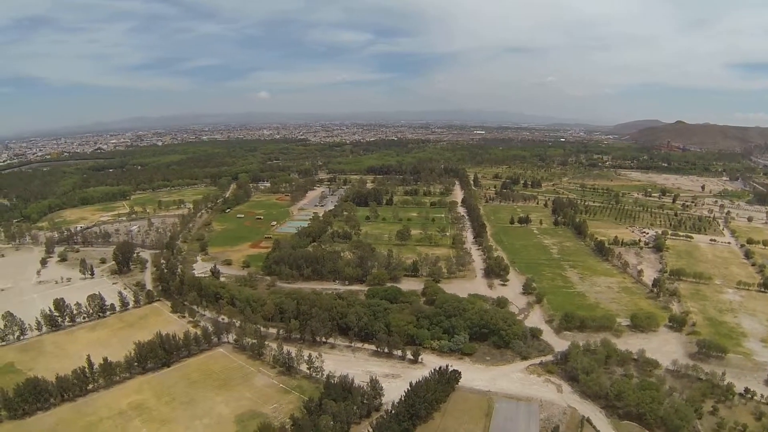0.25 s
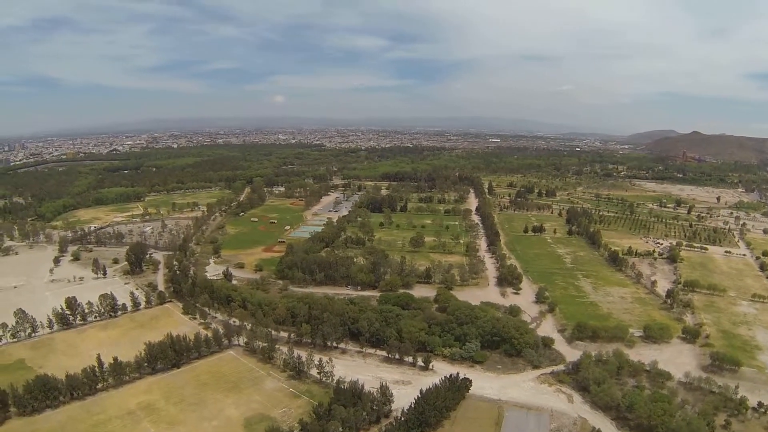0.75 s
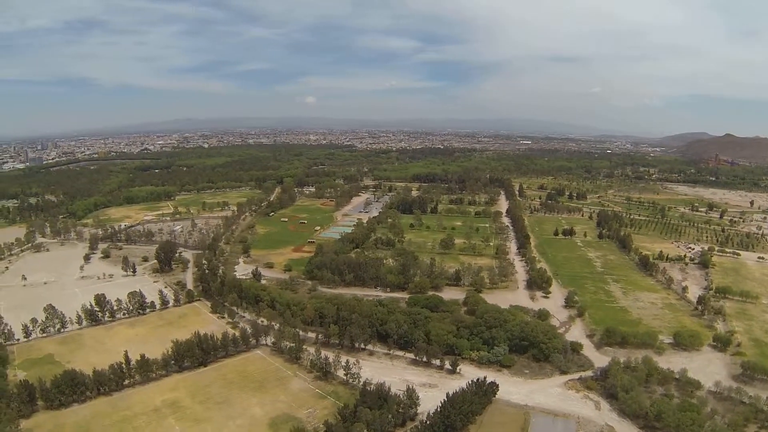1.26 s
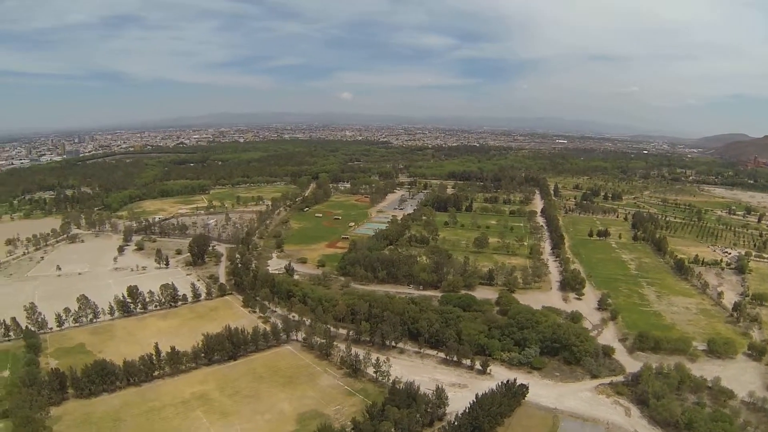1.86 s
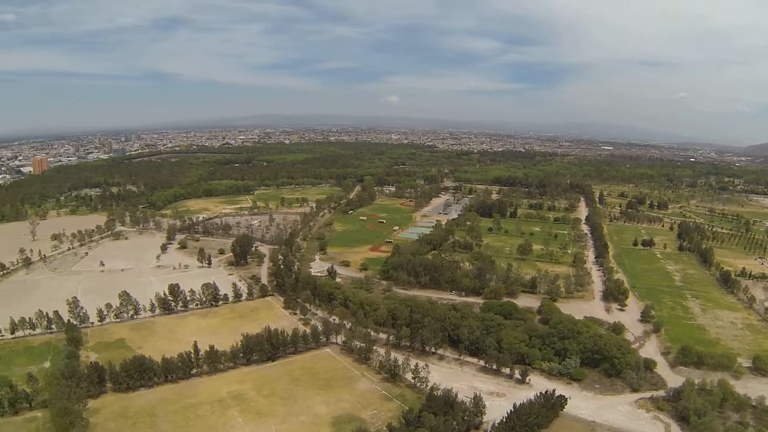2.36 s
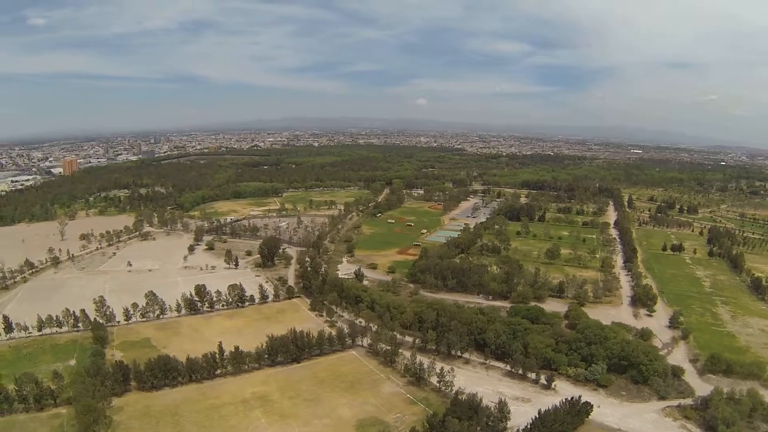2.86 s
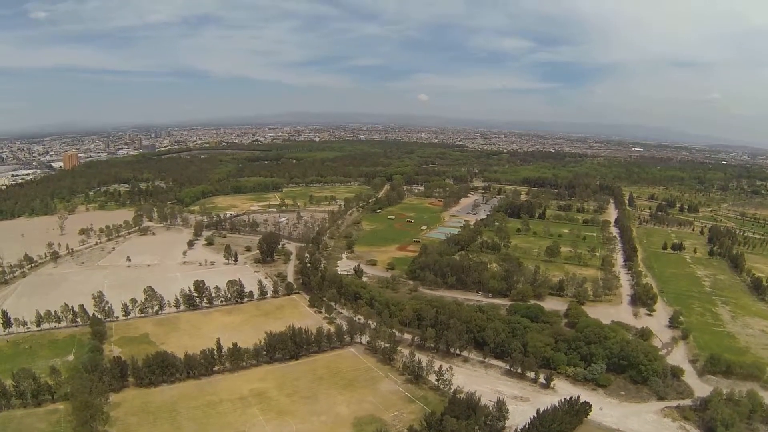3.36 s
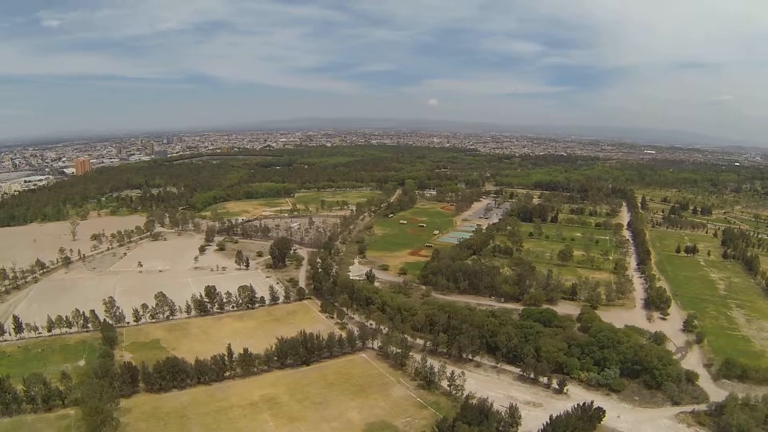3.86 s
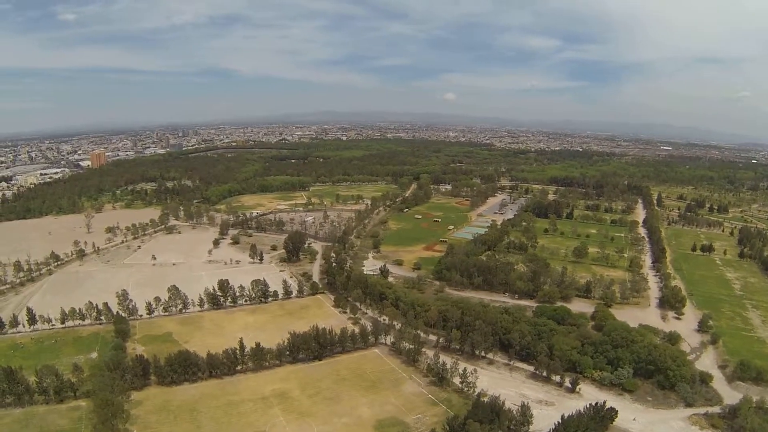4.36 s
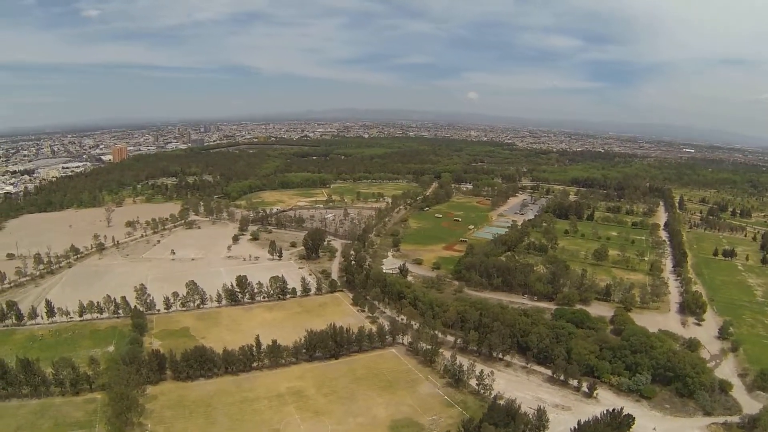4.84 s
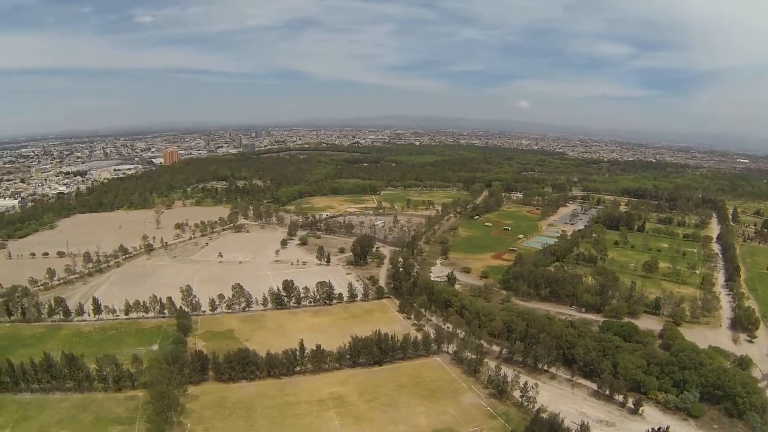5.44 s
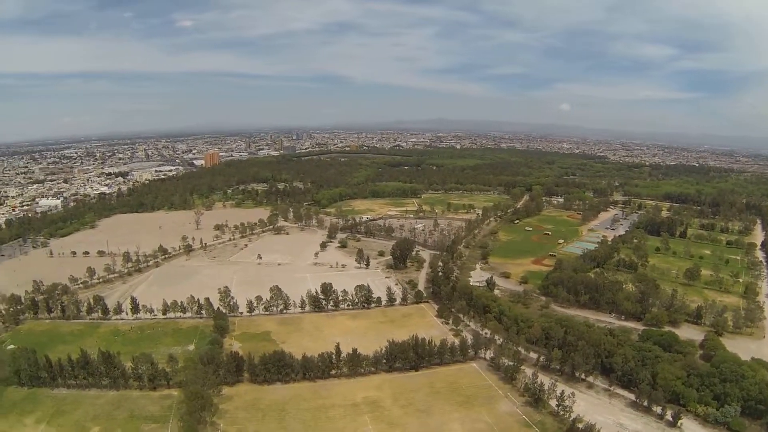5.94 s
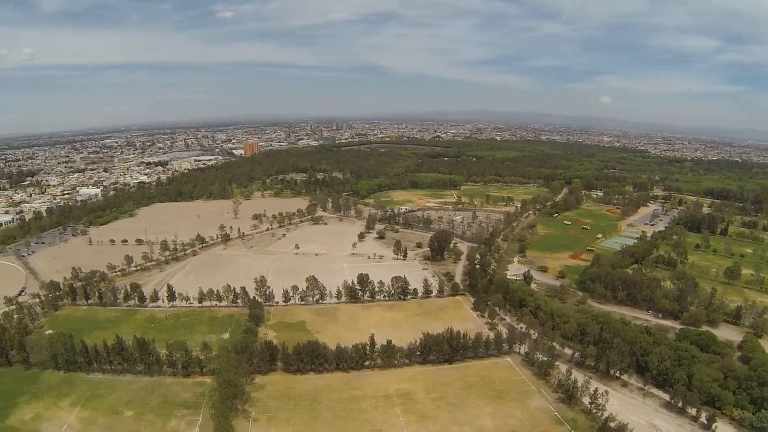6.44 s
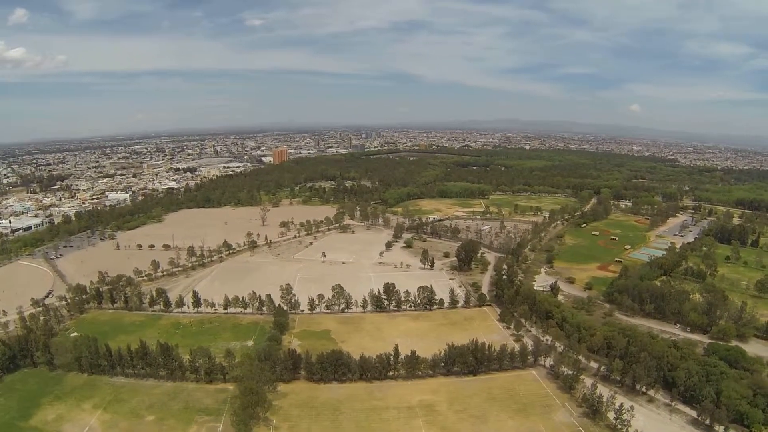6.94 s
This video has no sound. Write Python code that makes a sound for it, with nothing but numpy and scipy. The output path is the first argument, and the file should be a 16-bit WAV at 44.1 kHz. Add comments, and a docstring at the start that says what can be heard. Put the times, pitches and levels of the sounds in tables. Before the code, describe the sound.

Close under a flying drone, several propellers beat together in a low pulsing hum with airy wash, faint hiss, soft blade slaps and brief gritty buzzes.

```python
"""Six-rotor drone in flight

A drone is heard from the camera that hangs under it. Its six propellers hum and rasp at drifting speeds.
They throb when their blades fall in step; filtered noise makes the wind, propeller wash, swish and hiss.
The camera mount buzzes in bursts made of clicks, and its electronics whistle as close, thin tones.
Blades slap now and then and the frame ticks. The gain control ducks everything when the sound gets too loud.
"""
import sys
import numpy as np
from scipy import signal
from scipy.fft import rfft, irfft
from scipy.io import wavfile
from scipy.ndimage import uniform_filter1d, minimum_filter1d

SR = 44100
rng = np.random.default_rng(int(sys.argv[2]) if len(sys.argv) > 2 else 0)


def wrap_up_sound(samples):
    """Save the sound to the file named by the first command line argument, as 16-bit audio."""
    columns = np.atleast_2d(samples).T
    # keep every value between -1 and 1, then stretch to whole-number steps
    tamed = np.clip(columns, -1, 1)
    steps = np.round(tamed * 32767).astype(np.int16)
    wavfile.write(sys.argv[1], SR, steps)


N = 317520
T = np.arange(N) / SR  # time of each sample, in seconds

# Shaft speed of each rotor: time_s, speed_rev_per_s
SPEED_1 = [(0, 180), (.5, 177), (1.4, 179.5), (1.95, 176), (2.9, 183.5), (3.5, 178), (5.3, 173.3),
           (6.7, 181), (7.2, 181)]
SPEED_2 = [(0, 166.9), (.23, 169.7), (.43, 166.3), (.52, 166.5), (.72, 164.5), (.9, 166.5), (1.03, 167),
           (1.2, 169.9), (1.35, 168.3), (1.58, 168.8), (1.95, 165.3), (2.42, 166), (2.53, 167.9),
           (2.83, 169.6), (3, 167.5), (3.2, 168.8), (3.35, 164), (3.48, 162), (3.66, 161.5), (3.99, 156.8),
           (4.31, 158.3), (4.5, 154.5), (4.66, 152.5), (4.74, 155.5), (4.9, 154.8), (5.1, 152.8),
           (5.27, 149.8), (5.47, 152.3), (5.56, 155.5), (5.86, 154.9), (6.03, 157.4), (6.2, 155.6),
           (6.5, 159.6), (6.68, 159.9), (6.85, 161.8), (7.05, 161), (7.2, 162)]
SPEED_3 = [(0, 150.7), (.25, 151.3), (.8, 157), (1.1, 155), (1.6, 153), (2.3, 156.5), (2.6, 151),
           (2.95, 145), (3.6, 148.5), (4, 146.9), (5.1, 150.1), (5.9, 147), (7.2, 148)]
SPEED_4 = [(0, 165.5), (1, 171.6), (2.6, 174.5), (3.5, 169.8), (4.3, 162.2), (4.7, 166), (5.2, 170.1),
           (5.65, 169.7), (6.1, 164), (6.7, 165.2), (7.2, 164)]
SPEED_5 = [(0, 155.2), (0.701, 162), (2.4, 160.2), (4.1, 150.6), (5.601, 148.2), (6.501, 151.1),
           (7.2, 156.6)]
SPEED_6 = [(0, 160.1), (2, 168.4), (2.6, 165.1), (4.599, 158.5), (6.403, 162.6), (7.2, 152.8)]
# Four near rotors, before throbs reshape the hum and gusts lift the rasp:
# time_s, hum_db, rasp_db, shake_db (shake comes from imbalance)
NEAR_1 = [(0, -31, -54, -24), (.8, -37, -46.5, -28), (1.95, -39.5, -51.5, -22.5), (2.5, -37, -60.5, -22.5),
          (4.3, -30.5, -62.5, -28.5), (5.2, -31, -55, -28), (6.2, -28.5, -59.5, -27),
          (7.2, -30, -54.5, -28)]
NEAR_2 = [(0, -21.5, -62.5, -22), (.7, -22.5, -55.5, -20), (1.3, -19, -65, -19.5), (2.2, -16.5, -57, -28),
          (3.1, -22.5, -53.5, -28), (3.65, -27, -56.5, -21.5), (3.9, -21, -38, -28), (4.3, -21, -38, -38.5),
          (4.85, -26, -39, -34), (5.3, -34, -41, -35), (5.75, -14, -37, -29.5), (6.3, -22, -38.5, -29),
          (6.8, -16.5, -37.5, -28.5), (7.2, -17.5, -38.5, -26)]
NEAR_3 = [(0, -22.5, -45.5, -25), (1.1, -31.5, -42.5, -25), (2.1, -24, -46.5, -29.5), (2.9, -29, -48, -41),
          (4.9, -22, -50.5, -40), (6, -22, -55.5, -47), (7.2, -26, -50.5, -43.5)]
NEAR_4 = [(0, -26.5, -55.5, -46), (1, -28.5, -60.5, -37), (2.1, -24.5, -59, -40.5), (3.6, -26.5, -67, -40),
          (4.3, -19, -65, -33.5), (4.7, -16, -59.5, -29), (5.4, -18, -57, -34.5), (6.4, -28, -64.5, -30.5),
          (7.2, -24, -59, -34)]
# Each of the two far rotors, likewise: time_s, hum_db, rasp_db
FAR = [(0, -34.5, -54.5), (1, -29, -62.5), (2.1, -24.5, -57.5), (3.6, -20, -63.5), (4.3, -13, -64.5),
       (5.4, -20.5, -54.5), (6.4, -25, -66), (7.2, -21.5, -55)]
FAR_SHAKE_DB = -36
# Overtones of each propeller: multiple_of_shaft_speed, level_db
OVERTONES = [(3, -43), (4, -39), (5, -47)]
# Tone colour of the once-a-turn rasp, then the brighter one of the first motor: pitch_hz, relative_level_db
RASP_COLOUR = [(400, -20), (560, -2.5), (630, 7), (770, 3), (920, 6.5), (1080, 7.5), (1240, 5), (1420, 2),
               (1600, -1.5), (1950, -7), (2300, -17.5), (3100, -21.5), (3480, -10.5), (3850, -20.5),
               (5000, -29.5), (7000, -45.5), (9000, -66.5)]
BRIGHT_RASP_COLOUR = [(500, -10), (720, 1), (1000, -4), (1250, -1), (1800, -5), (2150, 1), (2480, -2),
                      (2850, -21), (4500, -22), (9000, -55)]
# Throbs, when the blades fall in step: peak_s, target_level_db, length_s
THROBS = [(0.132, -13, 0.029), (0.273, -14, 0.053), (0.439, -16, 0.32), (0.499, -12, 0.02),
          (0.556, -9.5, 0.011), (0.628, -12.5, 0.097), (0.718, -9, 0.044), (0.801, -8, 0.13),
          (0.961, -13.5, 0.11), (1.065, -14, 0.016), (1.152, -9, 0.11), (1.282, -13.5, 0.056),
          (1.323, -10.5, 0.17), (1.458, -11.5, 0.052), (1.548, -11.5, 0.037), (1.592, -15, 0.046),
          (1.657, -13.5, 0.047), (1.749, -14.5, 0.027), (1.802, -12, 0.029), (1.871, -15.5, 0.02),
          (1.935, -12.5, 0.07), (1.997, -8, 0.037), (2.033, -14.5, 0.048), (2.092, -13, 0.026),
          (2.174, -16.5, 0.045), (2.214, -15, 0.17), (2.264, -13, 0.19), (2.354, -13, 0.048),
          (2.455, -16, 0.16), (2.605, -11, 0.077), (2.683, -10, 0.066), (2.812, -11, 0.044),
          (2.876, -11.5, 0.078), (2.988, -14.5, 0.04), (3.029, -14, 0.054), (3.13, -16.5, 0.13),
          (3.28, -16, 0.072), (3.35, -12, 0.046), (3.409, -10.5, 0.022), (3.486, -14, 0.1),
          (3.583, -14.5, 0.082), (3.64, -14, 0.043), (3.708, -15.5, 0.034), (3.791, -15, 0.063),
          (3.83, -19.5, 0.028), (3.875, -13.5, 0.038), (3.974, -11, 0.075), (4.086, -10.5, 0.071),
          (4.148, -13.5, 0.024), (4.255, -7, 0.059), (4.338, -14, 0.044), (4.443, -8.5, 0.048),
          (4.561, -14, 0.041), (4.632, -15, 0.086), (4.707, -18.5, 0.031), (4.755, -12, 0.039),
          (4.797, -13.5, 0.032), (4.936, -17, 0.075), (4.988, -7, 0.028), (5.027, -12.5, 0.022),
          (5.073, -14.5, 0.058), (5.147, -16, 0.016), (5.189, -7.5, 0.028), (5.227, -9.5, 0.028),
          (5.269, -10.5, 0.024), (5.401, -15.5, 0.052), (5.466, -9.5, 0.046), (5.515, -11, 0.025),
          (5.621, -9.5, 0.094), (5.713, -9.5, 0.018), (5.783, -11.5, 0.065), (5.923, -14.5, 0.061),
          (6.005, -12.5, 0.1), (6.092, -7.5, 0.032), (6.189, -12.5, 0.062), (6.235, -11.5, 0.02),
          (6.317, -9, 0.057), (6.419, -7.5, 0.039), (6.53, -7.5, 0.071), (6.631, -10, 0.082),
          (6.677, -12, 0.021), (6.787, -7.5, 0.048), (6.848, -13.5, 0.041), (6.919, -17, 0.087),
          (6.994, -13.5, 0.035), (7.138, -13.5, 0.088)]
LULL_DB = -25  # target level between throbs
# Octave above the hum: time_s, level_relative_to_hum_db
OCTAVE = [(0, -29.5), (3, -24), (4.3, -18.5), (5.8, -14.5), (7.2, -24.5)]
# Gusts that make the blades rasp harder: peak_s, extra_level_db
SURGES = [(.28, 1), (1.06, 1.5), (1.531, 1.5), (1.9, 3.5), (2.58, 3), (3.94, 2.5), (4.229, 1.5), (4.9, 2.5),
          (5.16, 1.5), (5.38, 1), (5.91, 1.5), (6.4, 1.5), (6.51, 0.5)]
SURGE_S = 0.06  # length of each gust
# Blade slaps, each moved to a nearby crest of the hum: time_s, peak_db
SLAPS = [(.182, -13), (.384, -15), (1.137, -15), (1.655, -15), (1.943, -14), (2.599, -12), (2.803, -16),
         (2.864, -12), (2.903, -13), (3.092, -12), (3.215, -10), (3.337, -8), (3.404, -12), (3.471, -13),
         (4.379, -13), (4.56, -13), (4.623, -14), (4.974, -14), (5.027, -12), (5.222, -14), (5.308, -14),
         (5.458, -11.5), (5.579, -15), (5.7, -12), (5.895, -12), (5.917, -14), (6.084, -11), (6.404, -10),
         (6.776, -14), (6.985, -13), (7.127, -13)]
SLAP_HZ, SLAP_S = 560, .0012  # pitch; time from its middle until it fades to about a third
# Wind on the microphone: time_s, level_db
BUFFET = [(0, -20), (.3, -15.5), (.45, -19.5), (.7, -21.5), (.95, -17.5), (1.2, -20.5), (1.55, -22.5),
          (1.85, -20.5), (2.1, -21), (2.3, -17.5), (2.8, -18), (3, -19), (3.35, -16), (3.6, -22),
          (4.1, -25.5), (4.2, -27), (4.3, -19.5), (4.58, -24), (4.7, -28), (4.8, -20.5), (4.9, -22),
          (5.1, -19.5), (5.27, -23.5), (5.4, -19.5), (5.52, -27), (5.7, -27), (5.9, -29), (6.1, -23.5),
          (6.25, -20), (6.55, -22.5), (7.05, -21), (7.2, -19.5)]
GUST_DB, GUST_RATE_HZ = -0.2, 6  # size and rate of random changes in the wind
# Slow changes of the airflow; gusts also lift the swish: time_s, wash_db, swish_db, hiss_db
AIR = [(0, -21.5, -39, -53.5), (.7, -22.5, -39.5, -50.5), (1.5, -22, -44.5, -55.5),
       (1.9, -22.5, -44, -53.5), (2.02, -22.5, -42, -56), (2.27, -24.5, -42.5, -58.5),
       (2.55, -22, -41.5, -55), (3.2, -22.5, -40.5, -58), (3.6, -21, -40.5, -56.5), (4, -22.5, -40.5, -56),
       (4.5, -23, -41.5, -56), (4.9, -23, -40, -55), (5.4, -22, -40.5, -57), (5.9, -20, -41, -54.5),
       (6.3, -23.5, -40.5, -58), (7.2, -22, -42.5, -57.5)]
# Tone colours of the air layers: pitch_hz, relative_level_db_per_hz
WIND_COLOUR = [(10, -29.5), (25, -7), (45, -1.5), (64, -3), (81, -1.1), (95, -2), (120, -6), (160, -11),
               (210, -13), (300, -10), (600, -42), (1500, -81)]
WASH_COLOUR = [(150, -4), (215, -10), (246, -1), (275, -2), (360, -0.5), (450, 0), (540, -6), (620, -3.5),
               (740, -1.5), (820, -14), (1000, -25), (1500, -34.5), (4000, -85)]
SWISH_COLOUR = [(500, -24), (900, 2.5), (1300, -4), (1900, -7), (2300, -10.5), (2900, -17), (3450, -15),
                (4200, -24.5), (5500, -42), (9000, -63.5)]
HISS_COLOUR = [(1500, -14), (3000, -10.5), (3500, 2), (4700, 2), (5800, -5), (6800, -6), (8200, -12),
               (10000, -20.5), (11200, -27.5), (12300, -72.5)]
# Bursts of chatter from the camera mount: start_s, end_s, buzz_db, high_ring_db
BUZZES = [(0, .025, -47, -59), (.07, .28, -47.5, -59), (.28, .425, -46.5, -56), (.465, .53, -50, -57),
          (.585, .635, -43.5, -56), (.635, .76, -48, -56), (.93, 1.03, -53, -59), (1.03, 1.105, -46, -56),
          (1.39, 1.425, -48, -64), (1.755, 1.85, -47.5, -54.5), (1.85, 1.96, -47, -59),
          (2.08, 2.15, -54, -64), (2.15, 2.2, -48, -55.5), (2.285, 2.335, -50.5, -55),
          (2.335, 2.44, -50.5, -72), (2.56, 2.62, -49.5, -62), (2.655, 2.7, -53, -64),
          (2.77, 2.83, -53, -62), (2.88, 2.97, -57, -66), (3.075, 3.25, -52, -70), (3.27, 3.34, -48.5, -56),
          (3.34, 3.48, -48.5, -58.5)]
BUZZ_HZ = 123.1  # contacts per second
GRIT = .22  # scrape in the contacts, relative to their clicks
# Tone colours of the mount's buzz and high ring: pitch_hz, relative_level_db
BUZZ_COLOUR = [(120, -23.5), (2000, 11.5), (2900, -20.5), (3330, 11), (3600, 3), (3940, 8), (4300, -16),
               (4750, -19.5), (5400, -30.5), (7000, -17.5), (9500, -21.5), (12000, -34)]
BUZZ_RING_COLOUR = [(3600, -27), (4200, -2), (4750, 2), (5150, -3.5), (5500, -11.5), (7000, -15.5),
                    (9500, -31.5), (12000, -36)]
# Continuous sound of the mount, humming at twice the chatter rate: time_s, hum_db, whirr_db
MOUNT_HUM = [(0, -43, -54), (.7, -29, -47), (1.9, -26.5, -51), (3, -52, -63), (4, -39, -65),
             (7.2, -41, -60)]
# Tone colour of the whirr: pitch_hz, relative_level_db
WHIRR_COLOUR = [(800, -17.5), (1230, 5), (1600, 7.5), (2000, -5), (2400, -8), (2900, -30.5)]
# Tones of the electronic whistle: pitch_hz, relative_level_db
WHISTLE_LINES = [(8040.5, 0), (8067.5, -5.5), (8071, -10)]
# Whole whistle: time_s, level_db
WHISTLE = [(0, -59.5), (.9, -56.5), (2.3, -60.5), (4.3, -65), (5.9, -62.5), (6.4, -64.5), (7.2, -63.5)]
# Whine of the second motor: time_s, level_db
WHINE = [(0, -67), (.4, -69), (.5, -62), (.95, -67), (1.2, -68), (1.9, -67), (2.3, -69), (3.2, -71),
         (3.6, -70.5), (4.2, -79), (6.4, -80.5), (6.8, -72), (7.2, -72)]
WHINES_PER_TURN = 42
# Small ticks of the frame: start_s, starting_level_db
TICKS = [(2.578, -50), (3.32, -35), (5.174, -43), (6.088, -37)]
# Gain control: ceiling, speed of recovery, time to sense loudness, time to duck
LIMIT_DB, RECOVER_DB_PER_S, SENSE_S, ATTACK_S = -11, 33, 0.0026, 0.0004
PEAK_CEILING = .8  # 1 is full scale
EDGE_HZ = 14600  # top of the camera's sound band


def gain_of(db):
    """Turns decibels into amplitude."""
    return 10 ** (np.asarray(db) / 20)


def evened(x):
    """Scales a sound to an average (rms) level of 1."""
    return x / np.sqrt(np.mean(x ** 2) + 1e-20)


def curves(rows):
    """Draws each column after the time as a smooth-running value for every sample."""
    s, *columns = np.transpose(rows)
    return [np.interp(T, s, column) for column in columns]


def coloured(x, points):
    """Filters by a tone colour that falls away above its last point; rms 1."""
    hz, db = np.transpose(points)
    bins = np.fft.rfftfreq(N, 1 / SR)
    level_db = np.interp(np.log(bins + 1), np.log(hz), db)
    fall = np.maximum(bins / hz[-1], 1) ** 2
    return evened(irfft(rfft(x) * gain_of(level_db) / fall, N))


def noise():
    """White noise, with all pitches equally strong."""
    return rng.standard_normal(N)


def drift(rate_hz):
    """Random wandering, mostly slower than the given rate; rms 1."""
    bins = np.fft.rfftfreq(N, 1 / SR)
    return evened(irfft(rfft(noise()) / (1 + (bins / rate_hz) ** 2), N))


def lagged(x, seconds):
    """Follows x with the given time constant."""
    keep = np.exp(-1 / (seconds * SR))
    return signal.lfilter([1 - keep], [1, -keep], x)


def pulses(turns):
    """One click at each whole turn, shared between the two nearest samples."""
    at = np.flatnonzero(np.diff(np.floor(turns)) > 0)
    late = (np.floor(turns[at + 1]) - turns[at]) / (turns[at + 1] - turns[at])
    out = np.zeros(N)
    out[at], out[at + 1] = 1 - late, late
    return out


def swells(rows):
    """Sum of smooth rises and falls, from rows of peak_s, height, length_s."""
    t = T[::64]  # a coarse grid is enough for slow shapes
    shape = sum(height * np.exp(-(2 * (t - s) / length) ** 2) for s, height, length in rows)
    return np.interp(T, t, shape)


def surge_db():
    """Extra level of the blade noise while the propellers bite into gusts."""
    return swells((s, db, SURGE_S) for s, db in SURGES)


def turns_of(speed):
    """Adds up shaft speed into turns, from a random starting angle."""
    return np.cumsum(speed) / SR + rng.random()


def in_step(turns, lead, slip=.5):
    """Blade phase of a two-bladed rotor, eased to nearly meet the lead rotor's at every throb."""
    times = np.transpose(THROBS)[0]
    behind = np.interp(times, T, 4 * np.pi * (lead - turns))
    # a random miss in radians; unwrapping then takes the shortest way round
    behind = np.unwrap(behind + slip * rng.standard_normal(len(times)))
    return 4 * np.pi * turns + np.interp(T, times, behind)


def rotor(speed_rows, lead, hum_db, rasp_db, shake_db, colour,
          wobble=0.014, flutter=0.16, sway_db=1, overtone_sway_db=2):
    """Blades passing twice a turn hum, imbalance shakes once a turn, and clicks once a turn rasp."""
    speed, = curves(speed_rows)
    turns = turns_of(speed)
    rasp_db = rasp_db + surge_db()
    # uneven inflow makes each blade pass a little early or late, strong or weak
    early = 2 * np.pi * wobble * drift(6.9)
    load = np.sqrt(2) * gain_of(hum_db + sway_db * drift(3.4)) * (1 + flutter * drift(17))
    angle = 2 * np.pi * turns + early
    blade = in_step(turns, lead) + 2 * early
    hum = load * np.exp(1j * blade)  # complex, so its phase stays at hand
    overtone_gain = np.sqrt(2) * gain_of(overtone_sway_db * drift(2.8))
    overtones = overtone_gain * sum(gain_of(db) * np.cos(k * angle) for k, db in OVERTONES)
    shake = np.sqrt(2) * gain_of(shake_db) * np.sin(angle)
    clicks = pulses(turns + .003 * drift(20)) * (1 + .28 * drift(60))
    rasp = gain_of(rasp_db) * coloured(clicks, colour)
    # once-a-turn puffs, later used to shape the swish and hiss
    puffs = gain_of(rasp_db) ** 2 * np.exp(1.8 * (np.cos(2 * np.pi * turns) - 1))
    return hum, overtones + shake + rasp, puffs


def throbbing(hum, depth=0.76, least_db=-23):
    """Pulls the summed hum part of the way towards the strength of each throb and of the lulls."""
    throbs = swells((s, gain_of(db) ** 2, length) for s, db, length in THROBS)
    power = gain_of(LULL_DB) ** 2 + throbs
    # the floor keeps weak moments from being boosted too far
    beating = uniform_filter1d(abs(hum) ** 2 / 2, size=900) + gain_of(least_db) ** 2
    return hum * (power / beating) ** (depth / 2)


def octave(hum):
    """Doubles the phase of the hum to sound its octave, which swells with it."""
    return gain_of(curves(OCTAVE)[0]) * abs(hum) * np.cos(2 * np.angle(hum))


def air(hum, puffs, throb=0.038, wash_throb=0.048, flicker_db=1.5):
    """Noise as gusty wind and wash; swish and hiss come in puffs and swell where the rotors beat in step."""
    wind_db, = curves(BUFFET)
    wash_db, swish_db, hiss_db = curves(AIR)
    beat = 0.084 + evened(uniform_filter1d(abs(hum), size=300))
    pulsed = .62  # share of the noise power that comes in puffs
    gate = np.sqrt(1 - pulsed + pulsed * puffs / uniform_filter1d(puffs, size=4410))
    gate = gate * beat ** (2 * throb) * gain_of(flicker_db * drift(77))
    wind = gain_of(wind_db + GUST_DB * drift(GUST_RATE_HZ)) * coloured(noise(), WIND_COLOUR)
    wash = gain_of(wash_db) * coloured(noise() * beat ** (2 * wash_throb), WASH_COLOUR)
    swish = gain_of(swish_db + surge_db()) * coloured(noise() * gate, SWISH_COLOUR)
    hiss = gain_of(hiss_db) * coloured(noise() * (0.42 + gate), HISS_COLOUR)
    return wind + wash + swish + hiss


def mount_buzz(waver=1.0, unsteady_db=-0.5):
    """The stabiliser hums and whirrs, and chatters in bursts of slightly uneven, scraping clicks."""
    level = sum(gain_of(dbs)[:, None] * ((T > start) & (T < end)) for start, end, *dbs in BUZZES)
    clicks = pulses(BUZZ_HZ * T + .007 * drift(5)) * (1 + .2 * drift(60))
    scrape = lagged(clicks, .0007) * noise()
    buzz, ring = uniform_filter1d(level, size=200) * gain_of(unsteady_db * drift(10))
    contacts = evened(clicks) + GRIT * evened(scrape)
    chatter = buzz * coloured(contacts, BUZZ_COLOUR) + ring * coloured(contacts, BUZZ_RING_COLOUR)
    hum_db, whirr_db = curves(MOUNT_HUM)
    hum = np.sqrt(2) * np.sin(2 * np.pi * 2 * BUZZ_HZ * T + waver * drift(27))
    whirr = coloured(pulses(BUZZ_HZ * T + .025 * drift(3)), WHIRR_COLOUR)
    return chatter + gain_of(hum_db) * hum + gain_of(whirr_db) * whirr


def whistle(waver_db=1):
    """Close switching tones of the stabiliser beat together and waver."""
    lines = sum(gain_of(db) * np.sin(2 * np.pi * (hz * T + rng.random())) for hz, db in WHISTLE_LINES)
    return gain_of(curves(WHISTLE)[0]) * evened(lines * gain_of(waver_db * drift(9)))


def whine(waver_db=1.0):
    """The magnets of the second motor sing, faintly and unevenly, at a high multiple of its speed."""
    speed, = curves(SPEED_2)
    tone = np.sin(2 * np.pi * WHINES_PER_TURN * turns_of(speed) + .7 * drift(25))
    return gain_of(curves(WHINE)[0]) * evened(tone * gain_of(waver_db * drift(20)))


def slaps(hum):
    """A blade cuts its neighbour's wake: a short, smooth-edged pulse lands on a crest of the hum."""
    out = np.zeros(N)
    reach = round(SR / SPEED_2[0][1] / 4)  # about half a blade pass, in samples
    for s, db in SLAPS:
        first = round(s * SR) - reach
        crest = first + np.argmax(hum.real[first:first + 2 * reach])
        out[crest] = gain_of(db)
    t = np.arange(-256, 257) / SR
    slap = np.cos(2 * np.pi * SLAP_HZ * t) * np.exp(-(t / SLAP_S) ** 2)
    return signal.oaconvolve(out, slap, "same")


def ticks(decay_s=0.0061):
    """Brief creaks in the frame: fading noise with the colour of the mount."""
    level = sum(gain_of(db) * (T >= s) * np.exp(-abs(T - s) / decay_s) for s, db in TICKS)
    return uniform_filter1d(level, size=60) * coloured(noise(), BUZZ_COLOUR)


def scene():
    """Adds six rotors, with the second as lead, the air they move, the camera mount and the frame."""
    lead = turns_of(curves(SPEED_2)[0])
    near = [rotor(SPEED_1, lead, *curves(NEAR_1), BRIGHT_RASP_COLOUR),
            rotor(SPEED_2, lead, *curves(NEAR_2), RASP_COLOUR),
            rotor(SPEED_3, lead, *curves(NEAR_3), RASP_COLOUR),
            rotor(SPEED_4, lead, *curves(NEAR_4), RASP_COLOUR)]
    far = [rotor(speed, lead, *curves(FAR), FAR_SHAKE_DB, RASP_COLOUR) for speed in (SPEED_5, SPEED_6)]
    hum, rattle, puffs = map(sum, zip(*near, *far))
    hum = throbbing(hum)
    propellers = hum.real + octave(hum) + rattle + slaps(hum)
    mount = mount_buzz() + whistle()
    mix = propellers + air(hum, puffs) + mount + whine() + ticks()
    return mix[None]  # one channel


def record(dry):
    """Gain control ducks loud moments fast and recovers slowly; then peaks, ends and treble are limited."""
    loudness_db = 10 * np.log10(lagged(dry[0] ** 2, SENSE_S) + 1e-12)
    over_db = np.maximum(loudness_db - LIMIT_DB, 0)
    # hold the highest excess so far, letting it sink at the recovery speed
    recovery = RECOVER_DB_PER_S * T
    duck_db = lagged(np.maximum.accumulate(over_db + recovery) - recovery, ATTACK_S)
    ducked = dry * gain_of(-duck_db)
    # turn down smoothly around any peak above the ceiling
    headroom = minimum_filter1d(PEAK_CEILING / np.maximum(abs(ducked), PEAK_CEILING), size=200)
    limited = ducked * uniform_filter1d(uniform_filter1d(headroom, size=100), size=100)
    soft = limited * signal.windows.tukey(N, .001)  # very short fades at both ends
    low_pass = signal.firwin(511, EDGE_HZ, window=("kaiser", 9), fs=SR)
    return signal.oaconvolve(soft, low_pass[None], "same")


dry = scene()
out = record(dry)
wrap_up_sound(out)
```